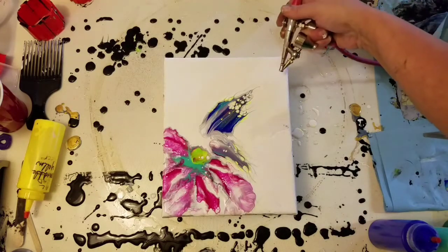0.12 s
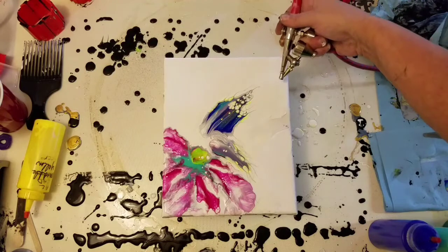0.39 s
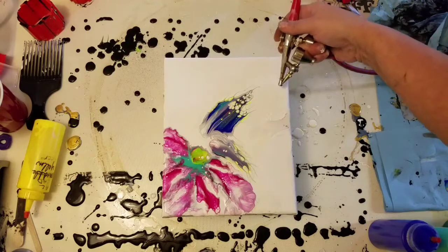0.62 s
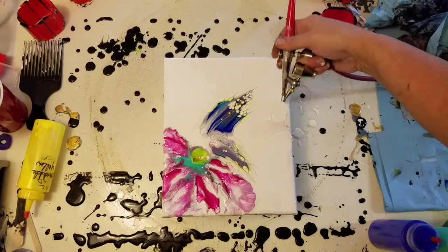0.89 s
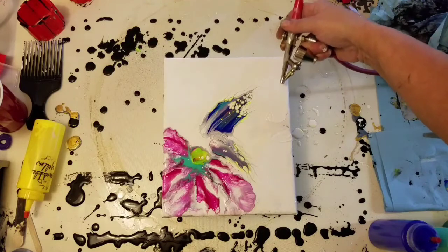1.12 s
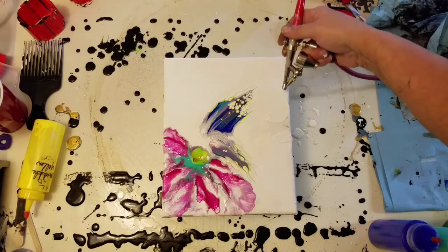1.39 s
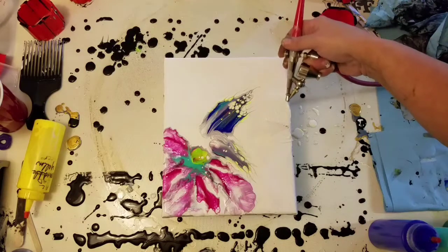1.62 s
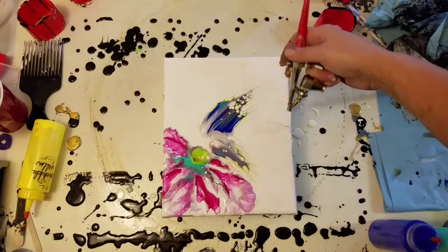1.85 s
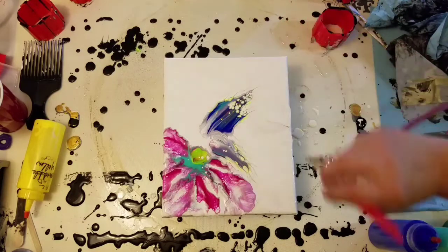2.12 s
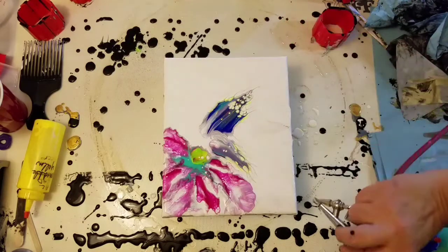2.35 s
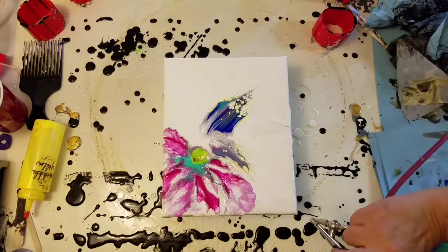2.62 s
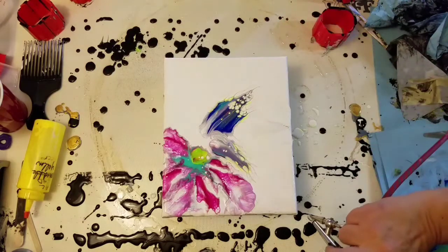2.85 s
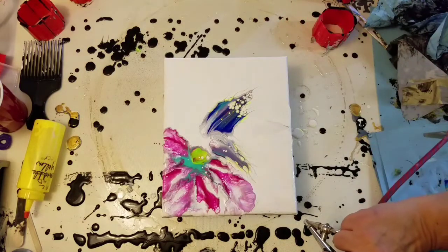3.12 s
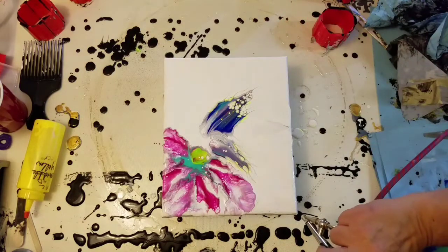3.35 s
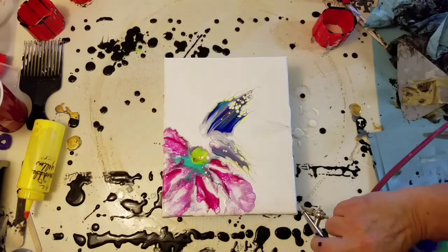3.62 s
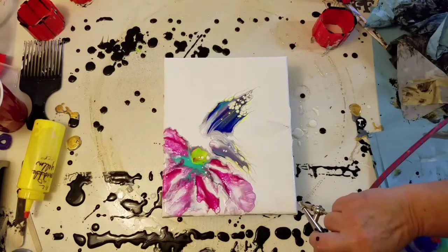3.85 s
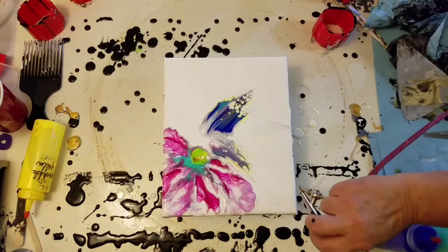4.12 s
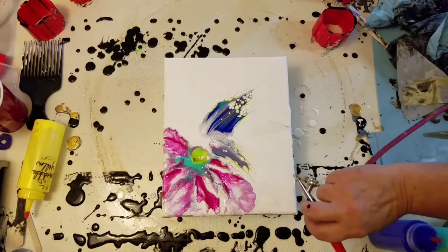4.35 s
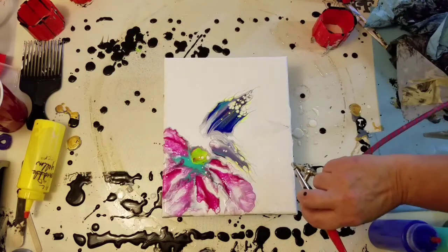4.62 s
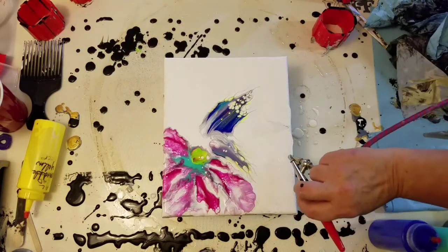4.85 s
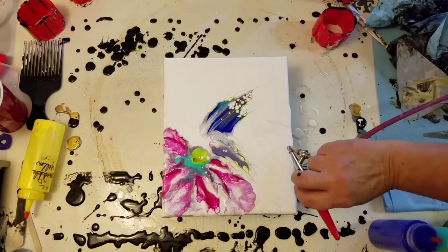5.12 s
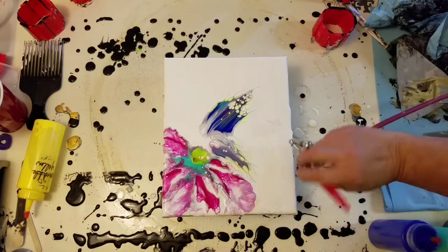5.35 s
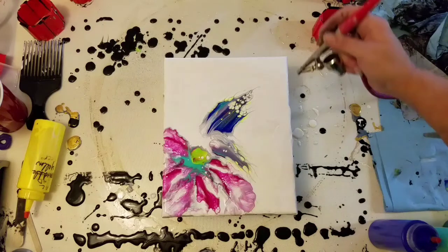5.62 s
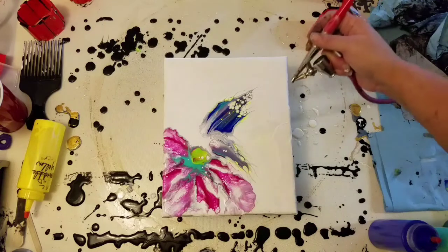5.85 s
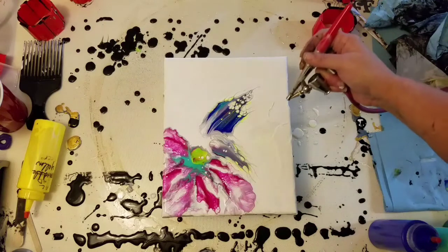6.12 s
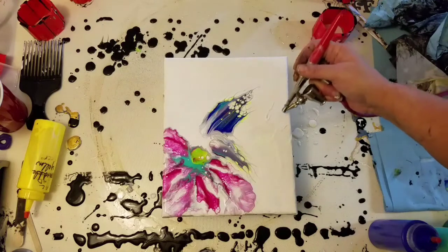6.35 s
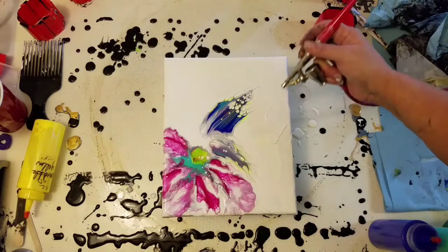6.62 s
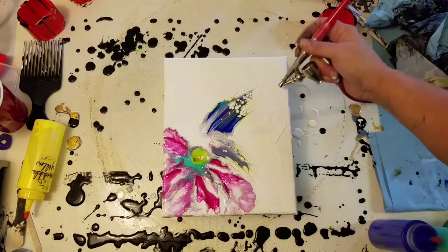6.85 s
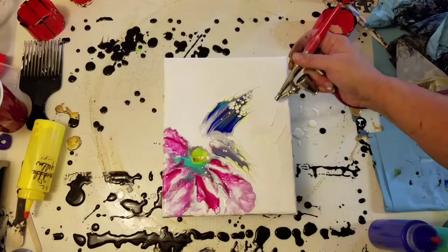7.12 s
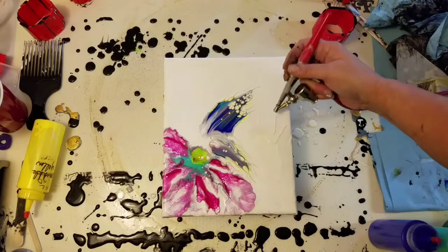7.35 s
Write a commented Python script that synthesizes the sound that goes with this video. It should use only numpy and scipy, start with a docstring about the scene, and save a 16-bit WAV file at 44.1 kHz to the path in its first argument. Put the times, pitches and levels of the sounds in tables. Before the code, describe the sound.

Four close, bright blasts of hissing airbrush air play on a stretched canvas, the second swelling slowly, over a faint low compressor hum.

```python
"""Four blasts of hissing air, the first under way at the start: an airbrush plays on a stretched canvas.
Turbulent noise in flickering bands makes the nozzle hiss and the scrub of the jet on the surface;
buffeting noise rings the membrane modes of the cloth. Near sound reaches the two ports of a phone on a stand
with a delay, a table bounce and a room tail. Behind it a small piston compressor hums under the craft table
as shaft harmonics over noise, with a faint sleeve swish, a narrow leak of air and microphone hiss."""
import sys
import numpy as np
from scipy import signal
from scipy.fft import rfft, irfft, next_fast_len
from scipy.io import wavfile
from scipy.ndimage import uniform_filter1d

SR = 44100
rng = np.random.default_rng(int(sys.argv[2]) if len(sys.argv) > 2 else 0)


def store_wav(level_fs):
    """Save 16-bit WAV to argv[1]."""
    pcm = np.round(np.clip(np.atleast_2d(level_fs), -1, 1) * 32767)
    wavfile.write(sys.argv[1], SR, pcm.T.astype(np.int16))


def voltage_ratio(decibels):
    """Convert decibels (scalar or array-like) to amplitude ratios, 20 dB per decade."""
    exponent = np.asarray(decibels, float) / 20
    return 10 ** exponent


N = 329868
T = np.arange(N) / SR
SIDES = np.array([[1], [-1]])  # left, right

# Trigger presses: press t/s, opening time/s, release t/s, closing time/s,
# relative level of full flow/dB, seepage level until the next press/dB re full flow
PRESSES = [(-0.3, 0.05, 1.741, 0.048, -33.5, -46), (2.503, 0.82, 5.427, 0.053, -34, -52),
           (5.733, 0.012, 6.56, 0.099, -34.5, -30), (6.768, 0.025, 7.41, 0.022, -34, -42)]


def level(x, db):
    """Root-mean-square normalisation: scale a signal to a given rms level in dB."""
    return x * voltage_ratio(db) / np.sqrt(np.mean(x ** 2))


def shape(x, points, lag_s=0):
    """Linear filtering: (f/Hz, level/dB) points joined on a log axis; a delay is a linear phase."""
    hz, db = np.transpose(points)
    size = next_fast_len(N + 4096)
    f = np.maximum(np.fft.rfftfreq(size, 1 / SR), 1)
    gain = voltage_ratio(np.interp(np.log(f), np.log(hz), db))
    delay = np.exp(-2j * np.pi * f * lag_s)
    return irfft(rfft(x, size) * gain * delay, size)[..., :N]


def walk(rate):
    """Slow random modulation: levels held for 1 / rate s, smoothed twice, standard deviation 1."""
    hold = int(SR / rate)
    steps = np.repeat(rng.standard_normal(N // hold + 1), hold)
    smooth = uniform_filter1d(uniform_filter1d(steps, hold), hold)[:N]
    return smooth / smooth.std()


def lag(x, time_s):
    """First-order relaxation: a one-pole filter with a time constant in seconds."""
    keep = np.exp(-1 / (time_s * SR))
    return signal.lfilter([1 - keep], [1, -keep], x)


def airbrush():
    """Jet noise and forced vibration: hiss, scrub and drumming follow the flow; small eddies make it sputter."""
    # Where the jet strikes as the hand travels: t/s, scrub level/dB re hiss, drumming level/dB re hiss,
    # upper-mode level/dB re hiss, hiss level/dB re full flow, scrub tilt/dB per octave
    aim = [(0, -11.5, -24.5, -40, 0.5, -4), (0.4, -10.5, -19.5, -34, -0.5, -2.5),
           (0.8, -13, -15, -36, 0.5, -1), (1.2, -9.5, -16, -30, -1.5, -2.5),
           (1.57, -14.5, -17, -24, 0.5, 1), (1.74, -12.5, -9.5, -22, 0, -0.5), (2.55, -9, -19, -27, 0, -4),
           (2.7, -9.5, -21, -23, 0, -2), (2.85, -8.5, -18, -21, -1, -4), (3.05, -10, -19, -25, -1.5, -1.5),
           (3.3, -10, -19.5, -25, -1, -2), (3.9, -9.5, -14.5, -27, -2, -1.5),
           (4.1, -8.5, -9.5, -18, -0.5, -2), (4.3, -10, -9.5, -17, -0.5, 0),
           (4.5, -10, -12.5, -19, 0, -0.5), (4.75, -11.5, -12.5, -24, 1, -1.5),
           (5.05, -13, -18, -23, 0.5, 1), (5.43, -10.5, -12.5, -19, 0.5, -3),
           (5.76, -12.5, -20, -30, 1.5, -5), (6, -10.5, -11, -22, -0.5, -0.5),
           (6.2, -11.5, -15.5, -21.5, 0.5, 0.5), (6.55, -9, -20.5, -22.5, 0, -0.5),
           (6.82, -12, -21.5, -33, -1, -3), (7.2, -10, -16, -22, 1, 0.5),
           (7.42, -10.5, -17, -20.5, -1, -1.5)]
    # Nozzle hiss spectrum before tilting: f/Hz, relative density level/dB per Hz
    nozzle_spectrum = [(4100, -21), (7000, -22.5), (8900, -7), (10300, -7.5), (11300, -1.5), (12500, -3),
                       (13400, 2), (14000, 1.5), (14600, -1.5)]
    # Surface scrub spectrum before tilting: f/Hz, relative density level/dB per Hz
    scrub_spectrum = [(1000, -28), (1650, -17), (1990, -4.5), (2240, -8), (2460, -3), (2800, -6),
                      (3250, -2.5), (3560, -4.5), (3850, 0.5), (4150, -1.5), (4400, -0.5), (7030, 0.5),
                      (8000, 0.5), (10400, 0.5), (17600, -120)]
    # Low membrane modes: f/Hz, bandwidth/Hz, relative level/dB
    low_modes = [(453, 130, -9.5), (569, 40, -5), (605, 49, 2.5), (688, 66, -0.5), (777, 74, -4.5),
                 (860, 260, -14.5)]
    # Upper modes, woken when the jet strikes mid-cloth: f/Hz, bandwidth/Hz, relative level/dB
    upper_modes = [(1080, 530, 0.5), (1320, 120, 1.5), (1490, 140, -7)]
    hiss_tilt_db, tilt_wander_db = 3, 0.23  # per octave; the colour wavers as the hand moves
    hiss_wander_db = 0.3
    # air left in the nozzle leaks out after the valve shuts
    bleed_s, hiss_bleed_db, scrub_bleed_db = 0.039, -23, -16.5
    drum_lag_s = 0.0063  # the cloth follows the jet a little late
    drum_side_db, upper_side_db = -9, 1  # share of the cloth's sound that differs between the ports

    s, *columns = np.transpose(aim)
    scrub_db, drum_db, upper_db, hiss_db, scrub_tilt = (np.interp(T, s, c) for c in columns)
    flow = trigger() * voltage_ratio(hiss_db + hiss_wander_db * walk(6))
    bleed = lag(flow, bleed_s)
    sputter_db = 0.62 * walk(400) + 0.69 * walk(40)

    nozzle_tilt = hiss_tilt_db + tilt_wander_db * walk(7.7)
    nozzle = eddies(nozzle_spectrum, 4760, 20000, sputter_db, 0.13, 10, nozzle_tilt)
    scrub_tilt = scrub_tilt + tilt_wander_db * walk(4.4)
    scrub = eddies(scrub_spectrum, 1055, 11000, 1.08 * sputter_db, 0.64, 20, scrub_tilt)
    jet = np.maximum(flow, voltage_ratio(hiss_bleed_db) * bleed) * (nozzle + valve())
    jet = jet + np.maximum(flow, voltage_ratio(scrub_bleed_db) * bleed) * voltage_ratio(scrub_db) * scrub

    low = voltage_ratio(drum_db) * canvas(low_modes, drum_side_db)
    upper = voltage_ratio(upper_db) * canvas(upper_modes, upper_side_db)
    drum = np.maximum(flow, lag(flow, drum_lag_s)) * (low + upper)
    return jet, drum


def trigger():
    """Valve throttling: the air flow cracks open, grows as a power of trigger travel, holds, shuts and seeps."""
    crack_db, crack_s = -25, 0.023  # the valve leaves its seat with a small jump of flow
    opening_power, closing_power = 1.4, 1.52
    flow = 0
    next_presses = [row[0] for row in PRESSES[1:]] + [N / SR]
    for (press, opening, release, closing, db, seep_db), until in zip(PRESSES, next_presses):
        crack = voltage_ratio(crack_db) * np.clip((T - press) / crack_s, 0, 1)
        travel = np.clip((T - press) / opening, 0, 1) ** opening_power
        shutting = np.clip(1 - (T - release) / closing, 0, 1) ** closing_power
        seep = voltage_ratio(seep_db) * (T < until + crack_s)
        flow = flow + voltage_ratio(db) * (crack + (1 - crack) * travel) * np.maximum(shutting, seep)
    return flow


def eddies(points, lo_hz, hi_hz, together_db, own_db, rate, tilt_db):
    """Turbulence: third-octave noise bands flicker independently under a shared flutter and a moving tilt."""
    noise = rfft(shape(rng.standard_normal(N), points))
    octave = np.log2(np.maximum(np.fft.rfftfreq(N, 1 / SR), 1))
    centres = np.arange(np.log2(lo_hz), np.log2(hi_hz), 1 / 3)
    out = 0
    for centre in centres:
        # raised-cosine bands that overlap and sum to one
        band = np.cos(np.pi / 2 * np.clip(3 * (octave - centre), -1, 1)) ** 2
        gain_db = own_db * walk(rate) + tilt_db * (centre - centres.mean())
        out = out + voltage_ratio(gain_db) * irfft(noise * band, N)
    return out * voltage_ratio(together_db) / np.std(irfft(noise, N))


def valve():
    """Narrow-band flow noise: air squeezing past the valve seat sings as the second blast opens, then fades."""
    # Valve song: t/s, level/dB re hiss
    song_levels = [(2.5, -3), (2.65, -10), (2.8, -14), (3.1, -15), (3.8, -21), (4.3, -30)]
    lo_hz, hi_hz = 10570, 10970
    s, db = np.transpose(song_levels)
    band = [(lo_hz - 250, -40), (lo_hz, 0), (hi_hz, -2.0), (hi_hz + 250, -40)]
    song = shape(rng.standard_normal(N), band)
    return level(song, 0) * voltage_ratio(np.interp(T, s, db, left=-120, right=-120))


def canvas(modes, side_db):
    """Modal resonance: jet buffeting rings the membrane, whose wide face reaches the ports partly unlike."""
    push = rng.standard_normal((2, N)) * voltage_ratio(1.66 * walk(45))
    ringing = 0
    for hz, width, db in modes:
        ringing = ringing + voltage_ratio(db) * signal.lfilter(*signal.iirpeak(hz, hz / width, SR), push)
    mid, side = level(ringing, 0)
    return mid + SIDES * voltage_ratio(side_db) * side


def near(x):
    """Interaural-style differences and comb filtering: the left port hears later; the table bounce combs both."""
    # Hand position in each press: left minus right level/dB before port colour, left port delay/microseconds
    places = [(4, 34.7), (3, 66.5), (3.5, 52.4), (3.5, 42)]
    # Port colour for near sound: f/Hz, left minus right level/dB
    port_tilt = [(600, -4.5), (1400, -3), (2800, -5), (3800, -4.3), (5600, -1.5), (7700, -.8),
                 (10200, -2.8), (13000, 1.2)]
    trip_s = .00159  # round trip between table and phone
    bounce = (0.09, 0.05)  # share that returns, left and right
    pan_wander_db = .4  # left minus right

    press = np.searchsorted([row[0] for row in PRESSES], T) - 1
    late = 0
    for k, (_, delay_us) in enumerate(places):
        late = late + shape(x * (press == k), [(1, 0), (SR, 0)], delay_us / 10 ** 6)
    ports = []
    for side, share, direct in zip(SIDES[:, 0], bounce, (late, x)):
        loop = np.zeros(int(trip_s * SR) + 1)
        loop[0], loop[-1] = 1, -np.clip(share, -.9, .9)  # feedback: the bounce repeats
        combed = signal.lfilter([1], loop, direct + room(x))
        ports.append(shape(combed, [(hz, side * db / 2) for hz, db in port_tilt]))
    pan_db = np.array(places)[press, 0] + pan_wander_db * walk(7)
    return voltage_ratio(SIDES * pan_db / 2) * np.array(ports)


def room(x):
    """Diffuse reverberation: an exponentially decaying noise tail, renewed as the hand moves."""
    t60_s, tail_db, top_hz = 0.087, 2.5, 17500
    hand_move_s = .09  # time in which the moving hand meets a new set of reflections
    t, hop = np.arange(int(t60_s * SR)) / SR, int(hand_move_s * SR)
    fade = np.sin(np.pi * np.arange(2 * hop) / (2 * hop))
    envelope = np.exp(-np.log(1000) * t / t60_s) * np.minimum(t / 0.0025, 1)
    padded = np.pad(x, (hop, 2 * hop))
    out = np.zeros(len(padded) + len(t))
    for i in range(0, N + hop, hop):
        tail = rng.standard_normal(len(t)) * envelope
        piece = signal.fftconvolve(padded[i:i + 2 * hop] * fade, tail / np.linalg.norm(tail))
        out[i:i + len(piece)] += piece
    return voltage_ratio(tail_db) * signal.lfilter(*signal.butter(1, top_hz, fs=SR), out[hop:hop + N])


def compressor():
    """Periodic excitation: wavering shaft harmonics over a housing rumble that throbs once a stroke."""
    # Piston strokes: multiple of the shaft rate, relative level/dB
    strokes = [(1, -1.5), (2, -18.5), (3, -10), (4, -21), (5, -10.5), (6, -10.5), (7, -24), (9, -14.5),
               (10, -26), (12, -23), (13, -16), (15, -25), (16, -25), (17, -27), (27, -24)]
    # Housing rumble spectrum: f/Hz, relative density level/dB per Hz
    motor_spectrum = [(26, -16), (45, -13), (75, -5), (90, -8.5), (113, -7), (140, -11), (160, -1),
                      (185, -9.5), (210, -8), (244, -8.5), (355, -9.5), (390, -13), (455, -10),
                      (510, -18.5), (600, -13.5), (850, -18), (1140, -24.5), (1600, -26), (2500, -32.5),
                      (4000, -45), (6000, -62)]
    shaft_hz, piston_db, motor_db = 58.64, -50, -51

    phase = 2 * np.pi * np.cumsum(shaft_hz * (1 + 0.000832 * walk(2))) / SR
    tones = 0
    for k, db in strokes:
        start, spread = rng.uniform(0, 2 * np.pi, 2)
        # higher harmonics reach the two ports by different paths
        skew = SIDES * min(k / 22, .5) * (spread - np.pi) / 3
        gain = voltage_ratio(db + min(k / 5, 1.6) * walk(8))
        tones = tones + gain * np.sqrt(2) * np.sin(k * phase + start + skew)
    mid, side = (shape(rng.standard_normal(N), motor_spectrum) for _ in range(2))
    side = shape(side, [(60, -6.5), (300, -4.5), (900, 2.5), (1500, 3.0)])
    rumble = (mid + SIDES * side) * (1 + 0.1 * np.sin(phase)) * voltage_ratio(1.4 * walk(5))
    return voltage_ratio(-.65 * SIDES) * (voltage_ratio(piston_db) * tones + level(rumble, motor_db))


def sleeve():
    """Friction noise: a faint broad swish while the arm crosses the table."""
    # Arm sweeping over the table: t/s, level/dB
    sweep = [(1.9, -82), (2.05, -70), (2.12, -63.5), (2.21, -64), (2.3, -77), (2.4, -82)]
    s, db = np.transpose(sweep)
    colour = [(700, -32), (1500, -1), (3000, -3), (6000, -17), (9000, -38)]
    swish = shape(rng.standard_normal((2, N)), colour)
    return level(swish, 0) * voltage_ratio(np.interp(T, s, db, left=-120, right=-120))


def leak():
    """Resonant flow noise: the shut valve whispers as air creeps past the seal, nearer the left port."""
    # Whisper of the shut valve: t/s, level/dB midway between the ports
    whisper = [(1.8, -84), (1.9, -73), (1.96, -88), (2.24, -88), (2.3, -72), (2.41, -72), (2.46, -88)]
    centre_hz, width_hz = 14200, 200
    s, db = np.transpose(whisper)
    peak = signal.iirpeak(centre_hz, centre_hz / width_hz, SR)
    air = signal.lfilter(*peak, rng.standard_normal((2, N)))
    return level(air, 0) * voltage_ratio(np.interp(T, s, db, left=-120, right=-120) + 3 * SIDES)


def scene():
    """Superposition: jet and canvas close to the phone, compressor further off, sleeve and leak faint."""
    jet, drum = airbrush()
    return voltage_ratio(1.27) * near(jet) + voltage_ratio(-1.1 * SIDES) * drum + compressor() + sleeve() + leak()


def top_cut(x):
    """Nothing passes above the cut-off."""
    return signal.sosfilt(signal.butter(12, 15840, fs=SR, output="sos"), x)


def record(dry):
    """Transducer self-noise and band limiting: the microphones add hiss; the top is cut off sharply."""
    # Microphone hiss spectrum: f/Hz, relative density level/dB per Hz
    mic_spectrum = [(1500, -22), (2500, -9), (4000, -8.5), (6000, -12), (8000, -17), (10000, -11),
                    (12500, -6.5), (14500, -4)]
    # Microphone hiss balance: f/Hz, left minus right level/dB
    hiss_pan = [(7000, -2), (10000, 1), (13000, 6.5)]
    hiss_db, top_hz = -65.5, 14560
    offset = -.0006  # steady bias of the converter

    hiss = level(shape(rng.standard_normal((2, N)), mic_spectrum), hiss_db)
    panned = []
    for side, h in zip(SIDES[:, 0], hiss):
        panned.append(shape(h, [(hz, side * db / 2) for hz, db in hiss_pan]))
    mix = shape(dry + np.array(panned), [(top_hz - 30, 0), (top_hz + 30, -90)]) + offset
    return top_cut(mix)


dry = scene()
out = record(dry)
store_wav(out)
```